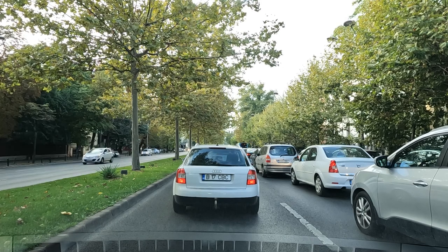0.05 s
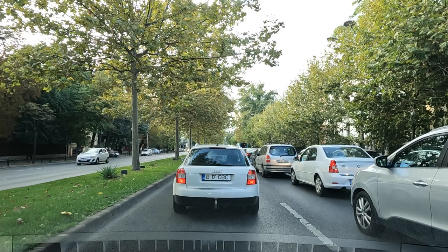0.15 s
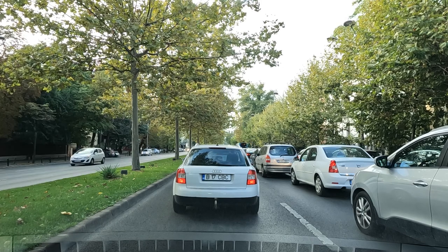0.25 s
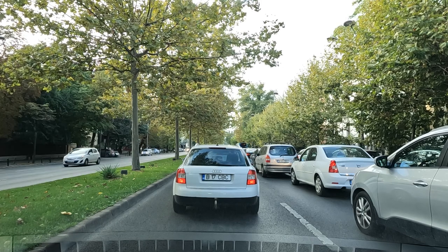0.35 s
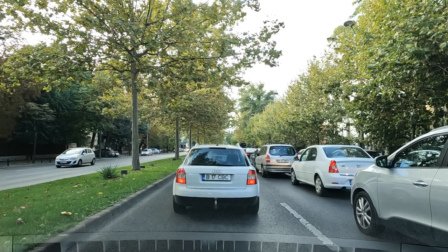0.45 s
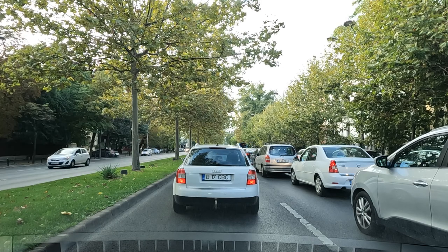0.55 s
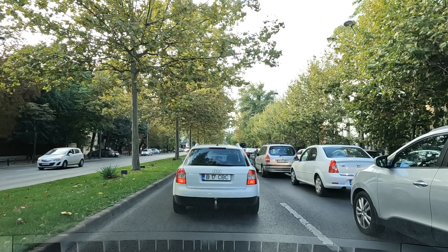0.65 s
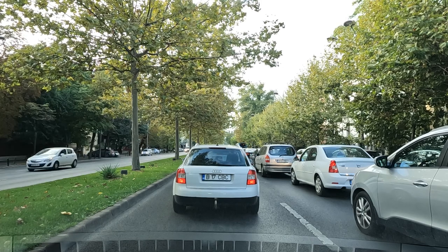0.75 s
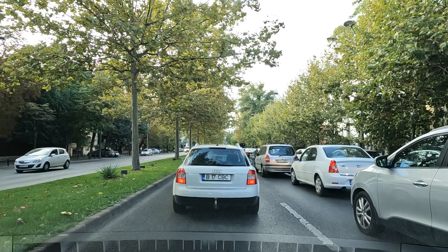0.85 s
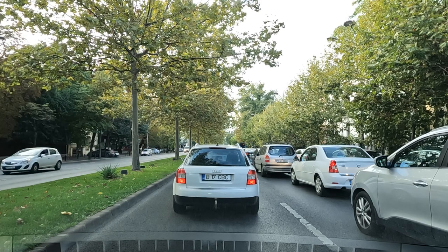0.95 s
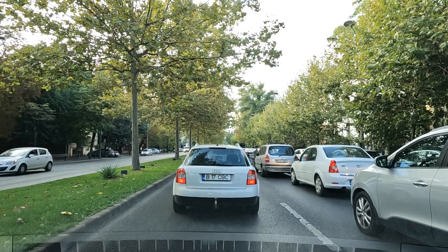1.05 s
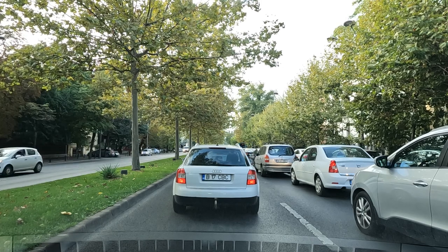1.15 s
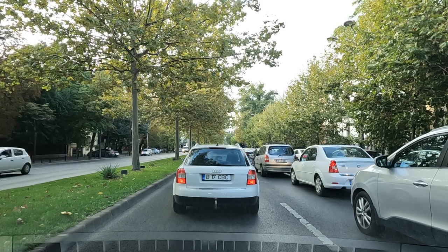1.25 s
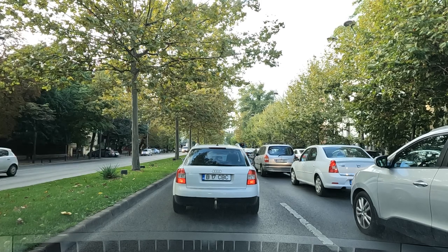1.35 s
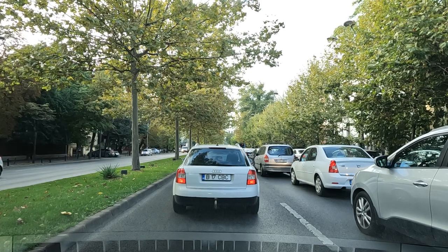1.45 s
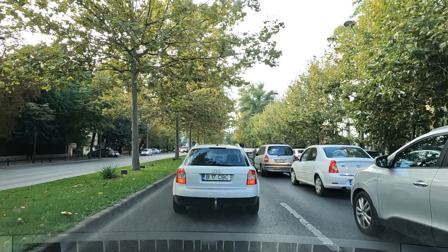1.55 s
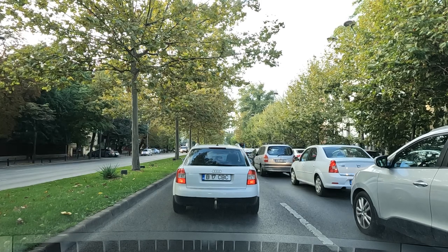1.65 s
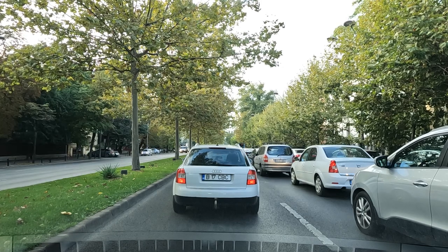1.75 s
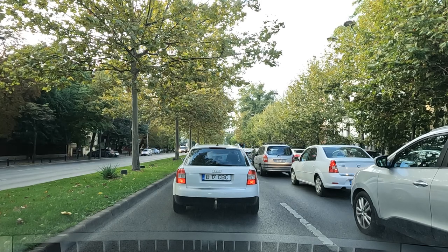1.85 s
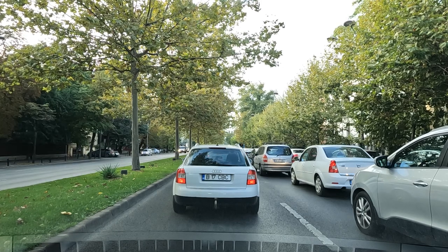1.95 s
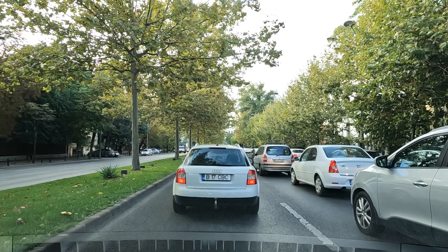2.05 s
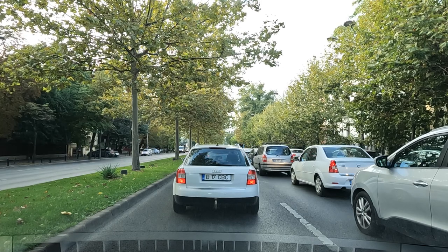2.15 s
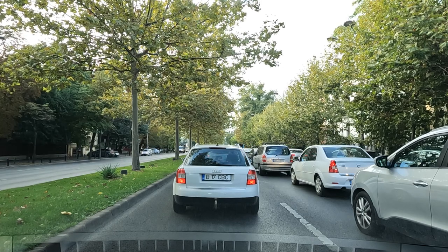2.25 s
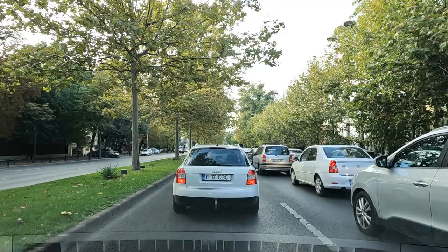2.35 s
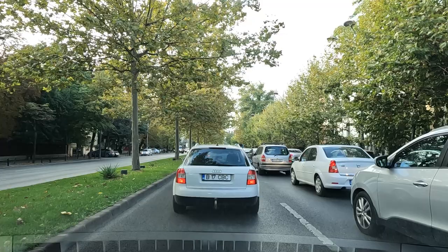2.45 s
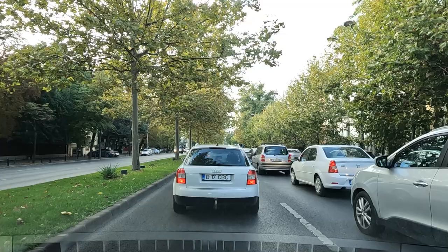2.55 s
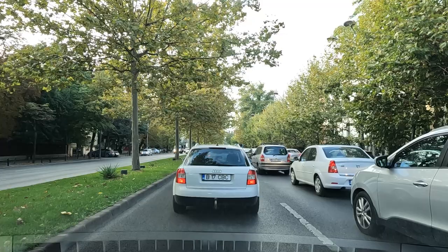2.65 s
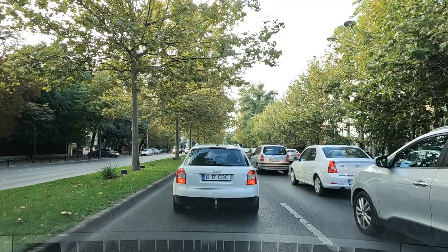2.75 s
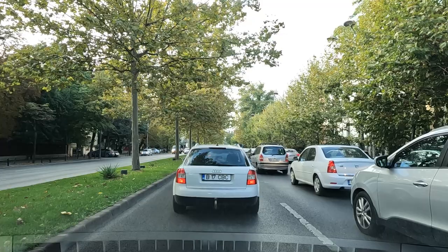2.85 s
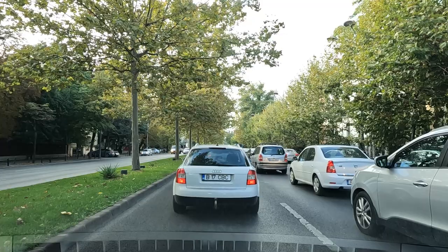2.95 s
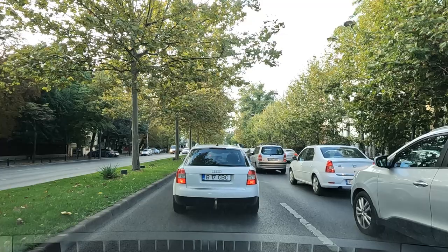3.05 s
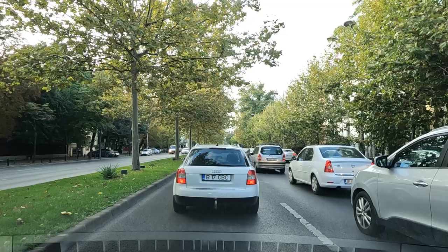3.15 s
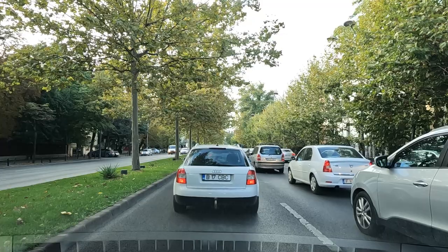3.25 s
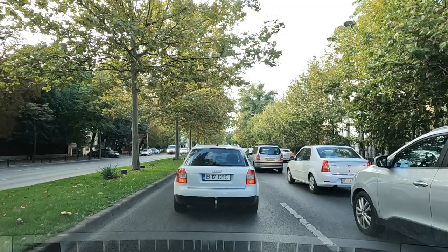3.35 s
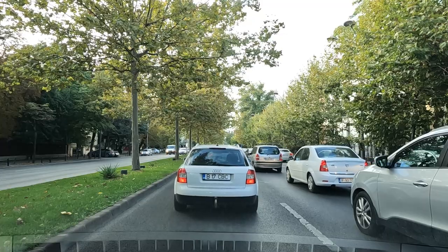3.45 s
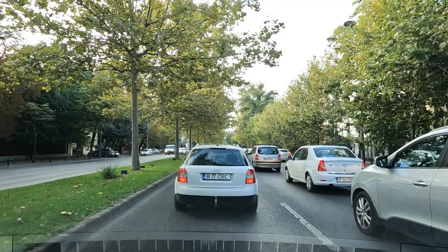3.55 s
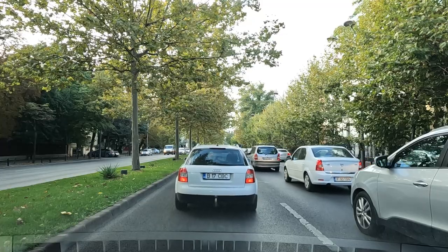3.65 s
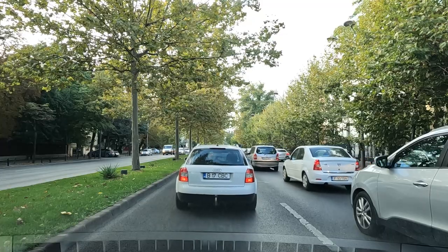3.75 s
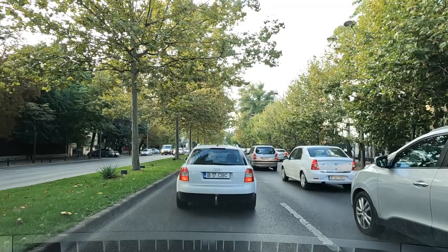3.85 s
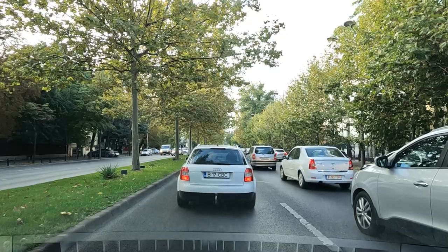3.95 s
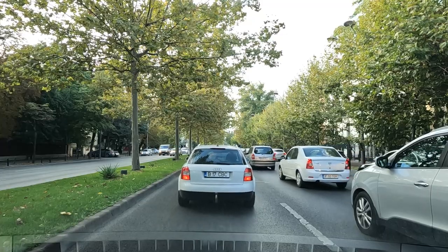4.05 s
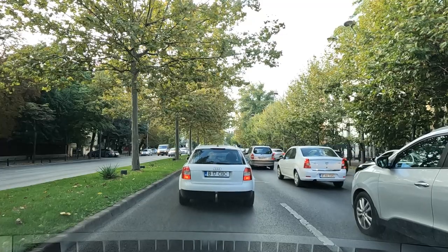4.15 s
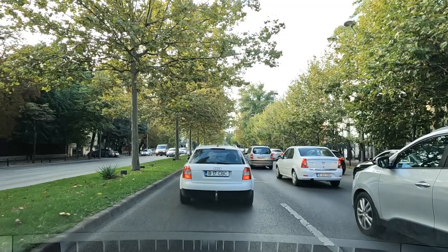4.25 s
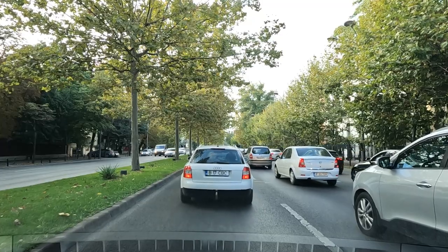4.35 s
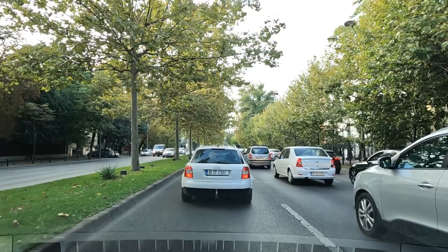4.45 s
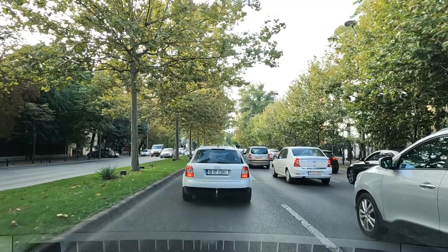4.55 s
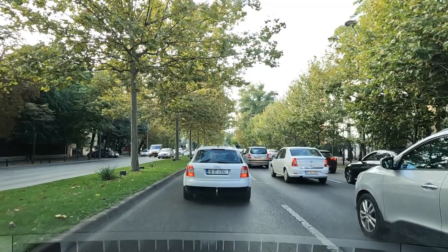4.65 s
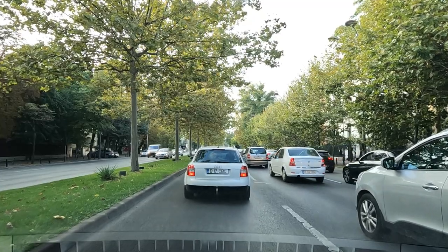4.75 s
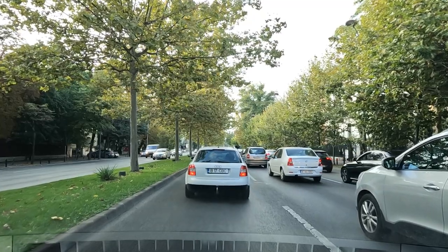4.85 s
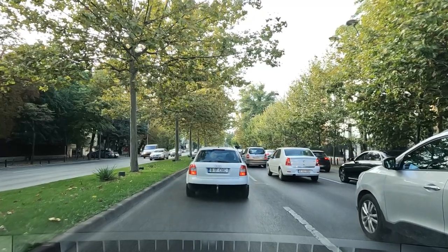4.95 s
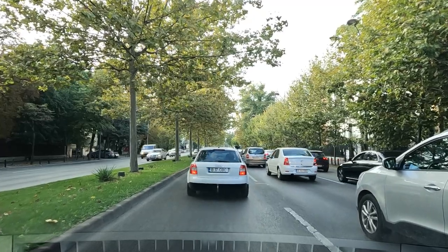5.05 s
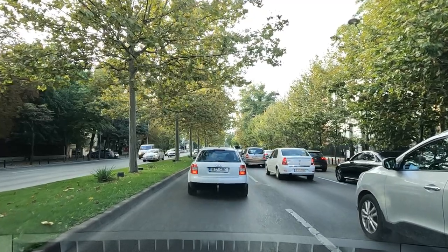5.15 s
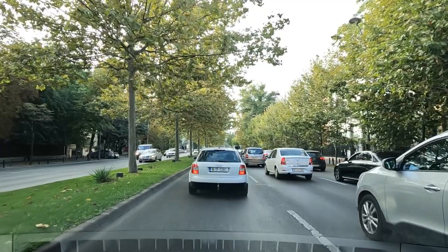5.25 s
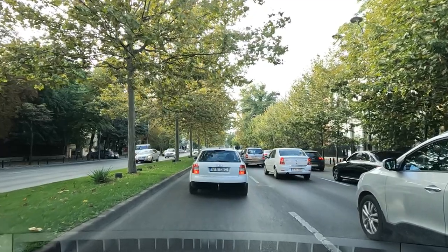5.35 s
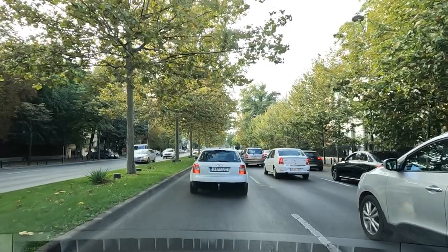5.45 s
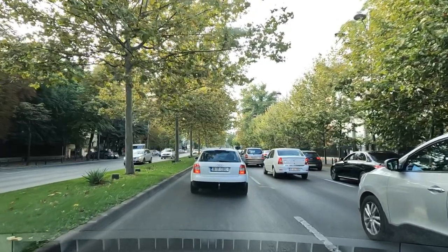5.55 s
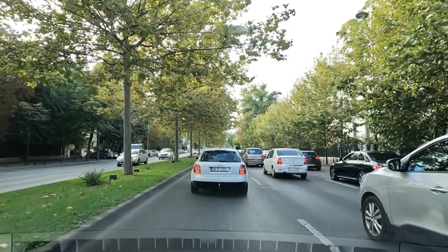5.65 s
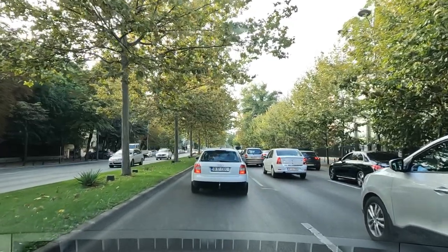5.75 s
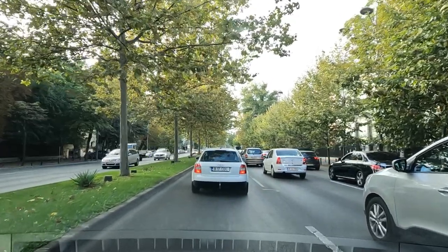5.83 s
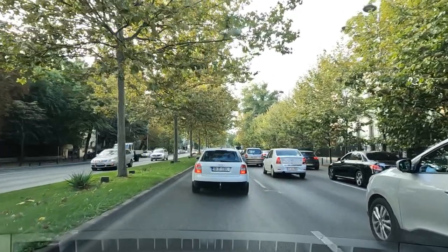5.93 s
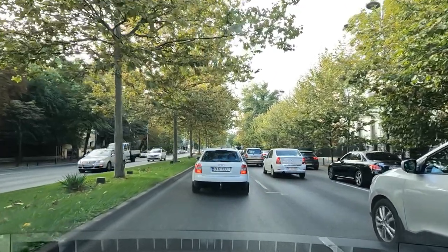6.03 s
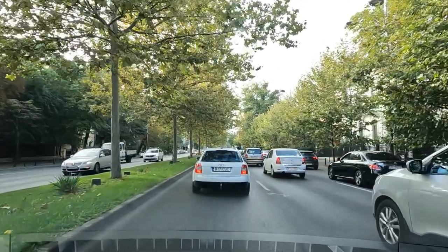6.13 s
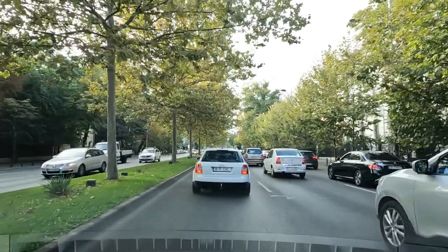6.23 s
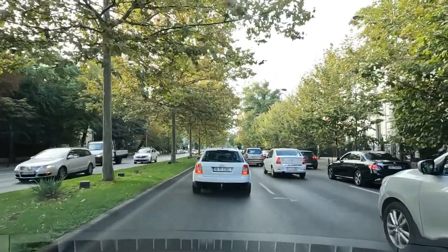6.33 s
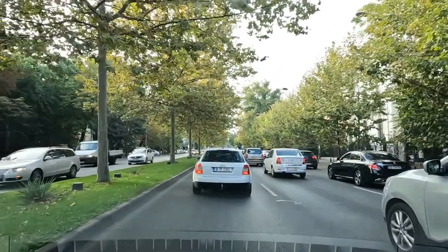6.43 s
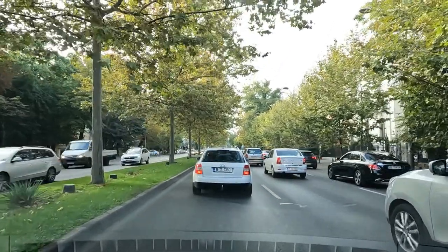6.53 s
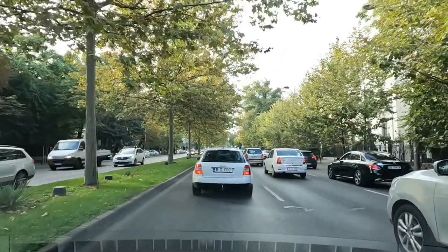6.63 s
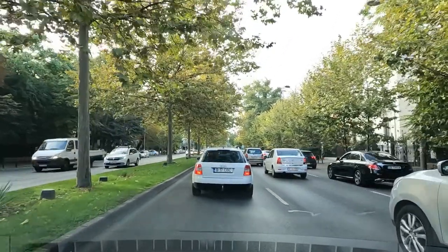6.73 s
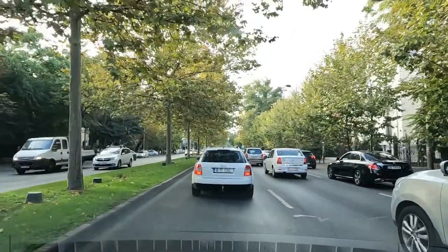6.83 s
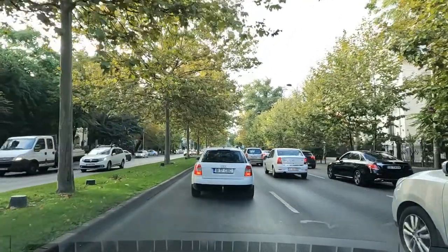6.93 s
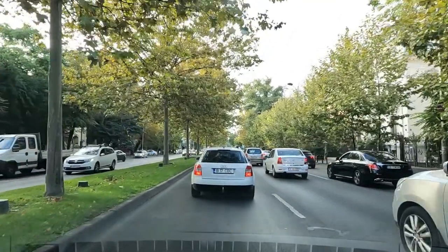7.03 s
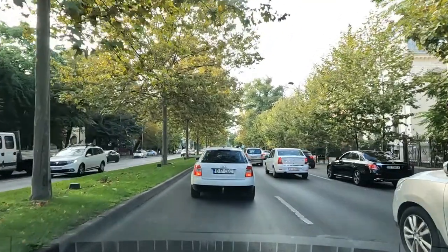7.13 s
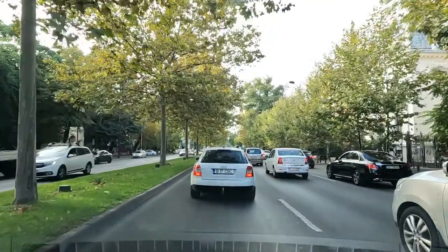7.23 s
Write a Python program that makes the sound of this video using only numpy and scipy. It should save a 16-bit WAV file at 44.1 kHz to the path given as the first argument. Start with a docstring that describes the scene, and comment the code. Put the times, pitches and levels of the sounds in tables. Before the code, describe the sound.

A car idles in city traffic and then rolls off, its deep rumble swelling in the cabin with a few faint trim ticks.

```python
"""Inside a closed car in city traffic, heard at two close microphone ports by the windscreen.
At first a four-cylinder engine idles: the body shell booms in its lowest modes, engines alongside hum,
and vents and street rush through the cabin's resonances. From about five seconds the engine takes load
and the car rolls off: the trim ticks, a bright puff of air passes and the boom grows. Towards the end
the exhaust roars, a panel rings and the engine bay hisses louder, with a faint whistle."""
import sys
import numpy as np
from scipy import signal
from scipy.fft import rfft, irfft, next_fast_len
from scipy.io import wavfile
from scipy.ndimage import uniform_filter1d, map_coordinates

SR = 44100
rng = np.random.default_rng(int(sys.argv[2]) if len(sys.argv) > 2 else 0)


def to_wav(sig):
    """Store sig (one row per channel, or 1-D mono) as 16-bit WAV at the path in sys.argv[1].

    Samples outside -1..1 are clipped; the rate is SR.
    """
    pcm = np.clip(np.atleast_2d(sig), -1, 1) * 32767
    pcm = np.round(pcm).astype(np.int16)
    wavfile.write(sys.argv[1], SR, pcm.T)  # frames by channels


N = 321489

# The engine's course. Each row: time in seconds, firing rate in Hz, load in dB above idle.
ENGINE_COURSE = [(0, 26.95, 0), (4.7, 26.95, 0), (5.05, 27, 2), (5.4, 31.5, 4), (5.9, 32, 4), (6.2, 32, 5),
                 (6.35, 32, 10), (6.55, 32, 9), (6.7, 32, 4), (6.9, 31.8, 5), (7.05, 31.6, 9),
                 (7.29, 31.6, 9)]


def amp(db):
    """Amplitude ratio of a level in dB."""
    return 10 ** (np.asarray(db) / 20)


def unit(x):
    """Normalisation to an rms of 1."""
    return x / np.sqrt(np.mean(np.abs(x) ** 2) + 1e-20)


def along(points, hz):
    """Interpolation of (Hz, value) points on a logarithmic frequency axis."""
    point_hz, values = np.transpose(points)
    return np.interp(np.log(hz + 1), np.log(point_hz + 1), values)


def curves(rows):
    """Linear interpolation in time: one value a sample for each column after the first."""
    times, *columns = np.transpose(rows)
    return [np.interp(np.arange(N) / SR, times, column) for column in columns]


def wobble(rate):
    """Slow random modulation: a spline through rate Gaussian knots a second."""
    return map_coordinates(rng.standard_normal(int(N * rate / SR) + 4), [np.arange(N) * rate / SR])


def filtered(x, response):
    """Linear filtering: the spectrum of x times a complex frequency response."""
    size = next_fast_len(N + SR // 2)
    return irfft(rfft(x, size) * response(np.fft.rfftfreq(size, 1 / SR)), size)[..., :N]


def resonance(f, centre_hz, width_hz):
    """Response of two equal damped resonators in cascade."""
    return (1j * f * width_hz / (centre_hz ** 2 - f * f + 1j * f * width_hz)) ** 2


def rush(spectrum, patchy_db):
    """Partly coherent stereo noise of rms 1, its gain varying in patches of time and frequency."""
    # Likeness of the two channels. Each row: frequency in Hz, correlation.
    coherence = [(100, 1), (240, 0.99), (470, 0.95), (660, .74), (930, 0.87), (1310, 0.71), (2600, 0.53),
                 (6000, 0.77), (12000, 0.44)]
    cells = signal.stft(rng.standard_normal((2, N)), nperseg=512)[2]
    patches = uniform_filter1d(rng.standard_normal(cells.shape[1:]), size=4, axis=0)
    patches = uniform_filter1d(patches, size=12, axis=1)
    pair = signal.istft(cells * amp(patchy_db * unit(patches)), nperseg=512)[1][:, :N]
    angle = lambda hz: np.arccos(np.clip(along(coherence, hz), -1, 1)) / 2
    gain = lambda hz: amp(along(spectrum, hz)) * (hz > spectrum[0][0]) * (hz < spectrum[-1][0])
    mid, side = filtered(pair, lambda hz: gain(hz) * [np.cos(angle(hz)), np.sin(angle(hz))])
    return unit(np.array([mid + side, mid - side]))


def air():
    """Broadband noise of vents, passing tyres and street, coloured by the cabin, over a steady hiss."""
    # Each row: time in seconds, then the levels of vents, tyres and street in dB.
    levels = [(.15, -50.5, -56.5, -57), (.4, -52, -59, -60), (1.4, -52.5, -58.5, -60.5),
              (2.6, -53.5, -61, -63.5), (3.8, -53, -57.5, -63), (4.6, -51.5, -60.5, -62),
              (6.2, -52.5, -61, -60.5), (6.7, -50.5, -59, -58), (7.2, -49, -58.5, -57)]
    # Noise spectra. Each row: frequency in Hz, relative density in dB.
    vents = [(220, -19), (248, -10.5), (263, -16), (282, -7.5), (305, -10), (335, -5), (400, -11.5),
             (440, -10.5), (466, -5), (490, -10), (530, -16.5), (640, -17.5), (770, -18.5), (815, -15),
             (845, -17), (880, -16), (912, -7), (950, -8.5), (990, -8), (1040, -12), (1065, -11.5),
             (1090, -18.5), (1300, -44)]
    tyres = [(900, -28.5), (1050, -6), (1200, -0.5), (1400, -5), (1700, -26)]
    street = [(1100, -27), (1400, -3.5), (1600, 0), (2000, -6), (2500, -16), (3000, -25.5), (3900, -46.5)]
    cabin_hiss = [(2000, -32.5), (2700, -2), (4200, -2), (5300, -15.5), (6600, -11), (7800, -11),
                  (8600, -26), (12000, -24), (14000, -42)]
    vents_db, tyres_db, street_db = curves(levels)
    return (amp(vents_db) * rush(vents, patchy_db=.5)
            + amp(tyres_db) * rush(tyres, patchy_db=1.14)
            + amp(street_db) * rush(street, patchy_db=.46)
            + amp(-77) * rush(cabin_hiss, patchy_db=1.55))


def puff():
    """Amplitude-shaped noise: a faint rustle, then a hiss of air that grows exponentially and is cut."""
    # The bright hiss. Each row: frequency in Hz, relative density in dB.
    spectrum = [(5000, -31), (6200, 0.5), (7200, 5), (8000, -1), (9000, -6.5), (10500, -4.5), (11800, -1),
                (13200, -10), (14200, -25)]
    rustle_s, start_s, top_s = 4.8, 5.55, 5.775
    rise_db_per_s, fall_db_per_s = 39, 350
    t = np.arange(N) / SR
    swell_db = np.minimum(rise_db_per_s * (t - top_s), fall_db_per_s * (top_s - t))
    crossfade = np.clip((t - start_s) / .06, 0, 1)
    rustle = np.clip((t - rustle_s) / .1, 0, 1) * amp(-90.5 + 3 * wobble(40))
    return ((1 - crossfade) * rustle + crossfade * amp(-75 + swell_db)) * rush(spectrum, patchy_db=.5)


def trim():
    """Impulse response of plastic trim: a snap and buzz in the dashboard, a damped ring, a sharp edge."""
    # Each row: start in seconds, snap gain in dB, buzz T60 in seconds, ring and edge gains in dB.
    ticks = [(5.149, -54, 0.11, -66, -92), (5.221, -66, .04, -72, -100), (5.487, -60, .02, -88, -71),
             (5.573, -60, .05, -72, -81), (6.243, -65, .02, -84, -84)]
    # Free vibration of the trim. Each row: frequency in Hz, relative level in dB, T60 in seconds.
    ring_modes = [(4700, -5, .07), (6600, -4, .09), (7000, 0, .09)]
    # Dashboard resonances. Each row: centre in Hz, width in Hz, gain in dB.
    dash_modes = [(3900, 1500, 0), (6900, 1000, 3), (9000, 2000, -16)]
    cracks, rings, edges = np.zeros((3, N + SR))
    t = np.arange(SR // 10) / SR
    ring = sum(amp(db - 60 * t / t60) * np.sin(2 * np.pi * hz * t) for hz, db, t60 in ring_modes)
    ring *= 1 - np.exp(-t / .001)
    snap = amp(-60 * t / .012)
    for start_s, snap_db, buzz_t60, ring_db, edge_db in ticks:
        at = round(start_s * SR)
        buzz = amp(-5 - 60 * t / buzz_t60)
        cracks[at:][:len(t)] += amp(snap_db) * (snap + buzz) * rng.standard_normal(len(t))
        rings[at:][:len(t)] += amp(ring_db) * ring
        edges[at:][:len(t)] += amp(edge_db) * snap * rng.standard_normal(len(t))
    dashboard = lambda f: sum((-1) ** k * amp(db) * resonance(f, hz, width)
                              for k, (hz, width, db) in enumerate(dash_modes))
    edge_band = lambda f: resonance(f, centre_hz=10800, width_hz=4000)
    return filtered(cracks[:N], dashboard) + rings[:N] + filtered(edges[:N], edge_band)


def engine_bay():
    """Intake and valve-gear hiss, amplitude-modulated at the firing rate, with a narrow-band whistle."""
    # Each row: time in seconds, level of the hiss in dB.
    levels = [(0, -78), (1.5, -83.5), (3, -84), (4.4, -82.5), (4.7, -75), (5, -74), (5.3, -77.5),
              (5.5, -78), (5.75, -74), (5.9, -80), (6.2, -75), (6.5, -71.5), (6.65, -72), (6.75, -69),
              (6.95, -68.5), (7.1, -66), (7.29, -70)]
    # Hiss through the bulkhead, and its whistle. Each row: frequency in Hz, relative density in dB.
    hiss_band = [(2000, -38), (2800, -2.5), (3800, 0), (4500, -5), (5300, -17), (6000, -4.5), (6640, -3),
                 (7400, -4.5), (8300, -21), (12000, -28.5), (13500, -42)]
    whistle_band = [(6450, -30), (6590, 0), (6690, 0.5), (6830, -30)]
    cycles = np.cumsum(curves(ENGINE_COURSE)[0]) / SR
    throb_db = .7 * np.sin(2 * np.pi * cycles) + .4 * wobble(8)
    whistle_rise = np.clip((np.arange(N) / SR - 6.1) / .3, .25, 1)  # full from 6.4 s
    whistle = whistle_rise * amp(-13 + 3 * wobble(14)) * rush(whistle_band, patchy_db=2)
    return amp(curves(levels)[0] + throb_db) * (rush(hiss_band, patchy_db=1.1) + whistle)


def neighbours():
    """Beating: engines idling alongside hum at nearby, slightly unsteady frequencies."""
    # Each row: firing rate in Hz, rms level in dB.
    idlers = [(30.0, -40.5), (35.0, -37.5)]
    hum = np.zeros(N)
    for hz, db in idlers:
        amplitude = np.sqrt(2) * amp(db + 2.1 * wobble(.96))
        cycles = np.cumsum(hz * (1 + .0063 * wobble(3.4))) / SR
        hum += amplitude * np.sin(2 * np.pi * (cycles + rng.random()))
    return hum


def drone():
    """Forced vibration of floor, panel and seats by engine and road, with exhaust roar under load."""
    # Each row: time in seconds, floor level in dB, panel level in dB.
    levels = [(0, -38.5, -41), (2, -40, -43), (3.5, -40, -40.5), (5, -39, -40.5), (5.9, -37, -42),
              (6.3, -33.5, -38.5), (6.7, -35, -38), (7.05, -32, -36.5), (7.29, -32, -35.5)]
    # Noise spectra. Each row: frequency in Hz, relative density in dB.
    floor = [(40, -16.5), (58, -5), (70, 1.5), (78, -0.5), (92, -5.5), (104, -1), (116, -1.5), (128, -4.5),
             (142, -10.5), (170, -40)]
    panel = [(120, -28.5), (145, -4.5), (158, -6.5), (168, 0), (185, 0.5), (200, 0), (210, -6.5), (228, -9),
             (245, -17), (262, -26.5), (300, -40.5)]
    exhaust = [(210, -29.5), (232, -2), (252, 3.5), (270, -5.5), (300, -8.5), (380, -4.5), (430, -24.5)]
    sharpest_panel_mode = [(192, -28.5), (197, -3), (200, -0.5), (203, -4), (208, -31.5)]
    seats = [(7, -12), (14, -1.5), (20, -1.5), (42, 3), (60, -11.5)]
    floor_db, panel_db = curves(levels)
    load_db = curves(ENGINE_COURSE)[1]
    return (amp(floor_db + 1.5 * wobble(6)) * rush(floor, patchy_db=1.1)
            + amp(panel_db + .7 * wobble(6)) * rush(panel, patchy_db=.95)
            + amp(-68.5 + 1.56 * load_db) * rush(exhaust, patchy_db=2)
            + amp(-66 + 2.1 * load_db) * rush(sharpest_panel_mode, patchy_db=1.7)
            + amp(-40 + .86 * load_db) * rush(seats, patchy_db=.5))


def shell():
    """Resonance of the body shell: two randomly driven modes, and tonal swells in Gaussian envelopes."""
    # The two lowest modes. Each row: centre in Hz, width in Hz.
    modes = [(31, 8.5), (53, 14.9)]
    # Each row: time in seconds, then the levels of the first and second mode in dB.
    levels = [(0, -36, -39.5), (2.5, -38, -41), (4, -38, -43), (4.8, -38.5, -37.5), (5.3, -34, -32),
              (5.9, -30, -28), (6.3, -29.5, -29.5), (6.8, -33, -28.5), (7.29, -27.5, -27.5)]
    # Each row: time of the top in seconds, pitch in Hz, top rms level in dB, half-length in seconds.
    swells = [(0.046, 53.3, -33.5, 0.11), (0.126, 29.2, -29.5, 0.076), (0.35, 53.9, -34, 0.07),
              (0.372, 110.6, -38.5, 0.042), (0.692, 54, -32, 0.076), (0.904, 29.94, -31, 0.059),
              (1.853, 52.5, -34.5, 0.074), (2.525, 195, -39, 0.038), (2.6, 73, -40, 0.052),
              (2.81, 54.14, -31, 0.072), (5.06, 71, -33.5, .05), (5.68, 191.7, -39.5, 0.035),
              (5.777, 65.7, -32.5, 0.048), (6.018, 114, -36.5, 0.052), (6.249, 73, -31.5, 0.066),
              (6.42, 155, -39, 0.078), (6.5, 71.8, -31, 0.08), (7.013, 199, -35.5, 0.077),
              (7.11, 157.6, -36, 0.069), (0.256, 28.76, -28, 0.077), (0.632, 33.07, -26.5, 0.11),
              (1.328, 53, -32.5, 0.053), (1.45, 30.96, -27.5, 0.084), (1.66, 30.13, -28.5, 0.061),
              (2.152, 31, -26.5, 0.064), (2.258, 54.9, -30, 0.055), (2.48, 29.5, -22, 0.084),
              (2.96, 30.04, -27.5, 0.076), (3.499, 32, -27.5, 0.061), (4.183, 54.35, -28.5, 0.13),
              (4.377, 31.42, -31.5, 0.054), (4.74, 29.83, -29.5, 0.065), (4.69, 54.9, -28.5, 0.093),
              (4.933, 53.26, -30.5, 0.092), (5.295, 34, -22.5, 0.071), (5.427, 29, -24.5, 0.12),
              (5.429, 49.66, -28, 0.057), (5.699, 30, -22, 0.067), (5.848, 53, -22, .07),
              (5.922, 31.5, -17.5, 0.1), (6.095, 31.5, -21, 0.19), (5.563, 42.25, -27, .1),
              (6.0, 42.9, -27.5, 0.079), (6.328, 43.97, -28.5, 0.13), (6.58, 33.44, -23.5, 0.13),
              (6.55, 55.4, -27, 0.12), (6.773, 31, -25, 0.053), (6.942, 38.2, -25, 0.073),
              (7.155, 49.6, -19.5, .13), (5.48, 212, -44, 0.13), (5.868, 218, -44, .08),
              (6.127, 213, -43, .1), (6.53, 212, -41, 0.13), (5.87, 115, -38, .08), (7.2, 210, -37.5, .07)]
    t = np.arange(N) / SR
    boom = np.zeros(N)
    for db, (hz, width) in zip(curves(levels), modes):
        boom += amp(db) * unit(filtered(rng.standard_normal(N), lambda f: resonance(f, hz, width)))
    for top_s, hz, db, half_s in swells:
        envelope = np.sqrt(2) * amp(db) * np.exp(-2 * ((t - top_s) / half_s) ** 2)
        boom += envelope * np.sin(2 * np.pi * (hz * t + rng.random()))
    return boom


def engine():
    """Periodic firing gives harmonics, each slightly unsteady; load raises some and lowers others."""
    # Each row: multiple of the firing rate, peak level at idle in dB, change in dB per dB of load.
    harmonics = [(1, -40, .6), (2, -37.5, -1), (16, -70, -1), (5, -65, 2.8), (8, -48, -4)]
    firing_hz, load_db = curves(ENGINE_COURSE)
    cycles = np.cumsum(firing_hz * (1 + .002 * wobble(4))) / SR
    tones = np.zeros(N)
    for multiple, idle_db, slope in harmonics:
        level_db = idle_db + slope * load_db + 1.8 * wobble(3.3)
        tones += amp(level_db) * np.sin(2 * np.pi * (multiple * cycles + rng.random()))
    return tones


def scene():
    """Superposition: tones, boom and ticks are alike in both channels; the noises have their own width."""
    return engine() + neighbours() + shell() + trim() + drone() + air() + engine_bay() + puff()


def record(dry):
    """Level and phase differences between two close ports, followed by a steep low-pass."""
    # Each row: frequency in Hz, level of left over right in dB.
    level_difference = [(60, 1.06), (240, 0.5), (660, 0), (1500, -.5), (4000, -0.7), (7000, -1.5),
                        (11000, -1.5)]
    # Each row: frequency in Hz, phase lead of the left in radians.
    phase_lead = [(60, 0), (600, -0.32), (1290, 0.34), (2070, 0.33), (2760, -0.008)]
    side, cutoff_hz = np.array([[.5], [-.5]]), 14300
    ports = lambda hz: amp(side * along(level_difference, hz)) * np.exp(1j * side * along(phase_lead, hz))
    return filtered(dry, lambda hz: ports(hz) / (1 + (hz / cutoff_hz) ** 40))


dry = scene()
out = record(dry)
to_wav(out)
```